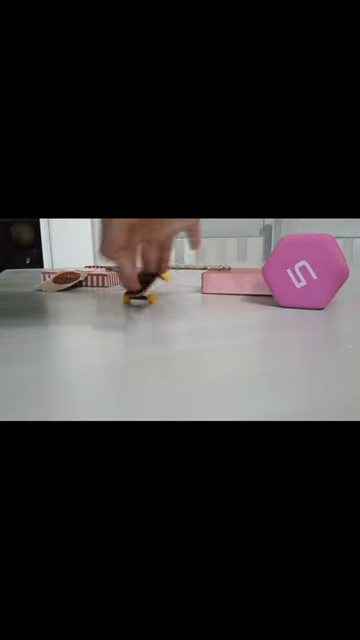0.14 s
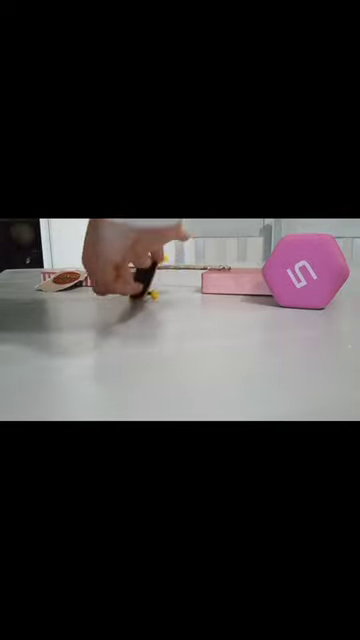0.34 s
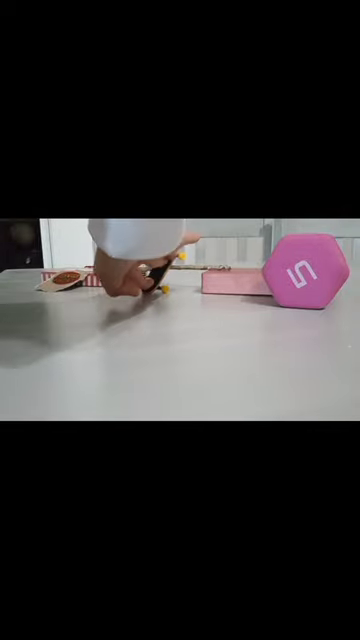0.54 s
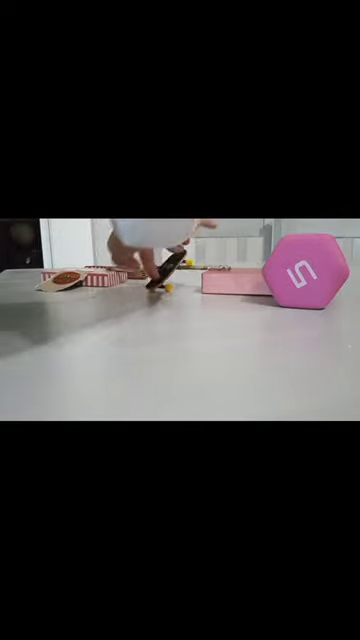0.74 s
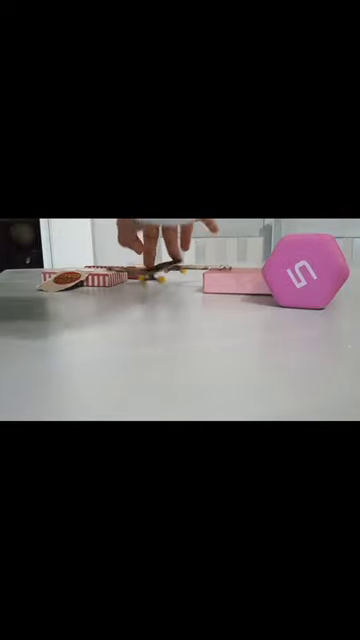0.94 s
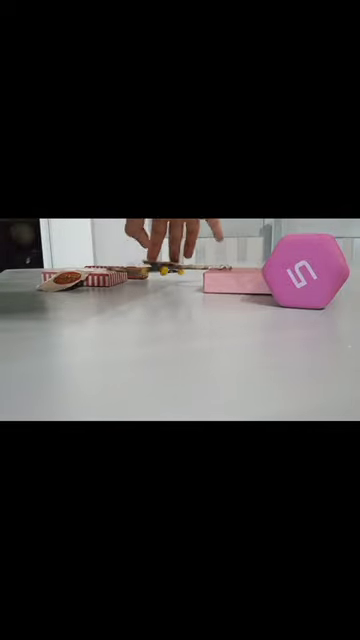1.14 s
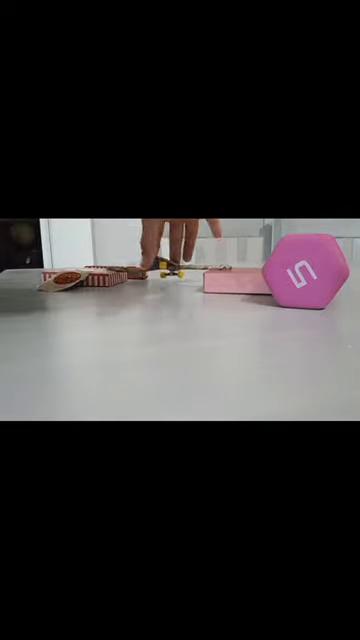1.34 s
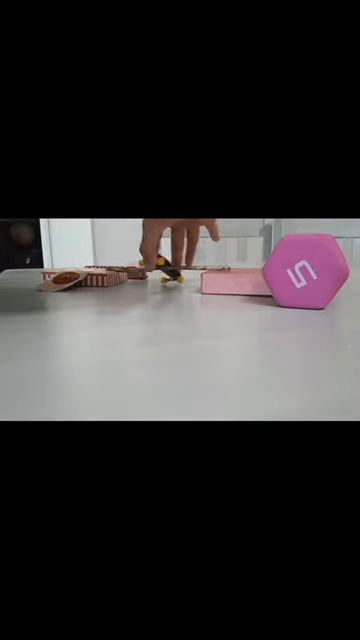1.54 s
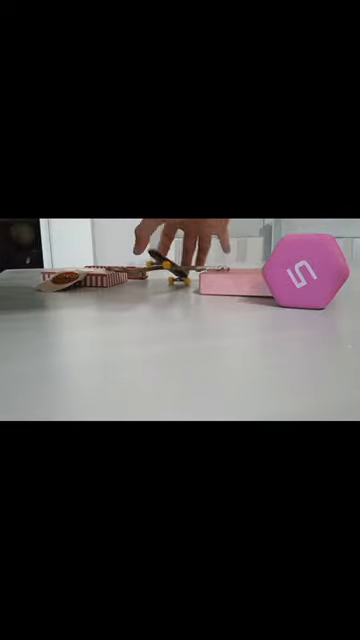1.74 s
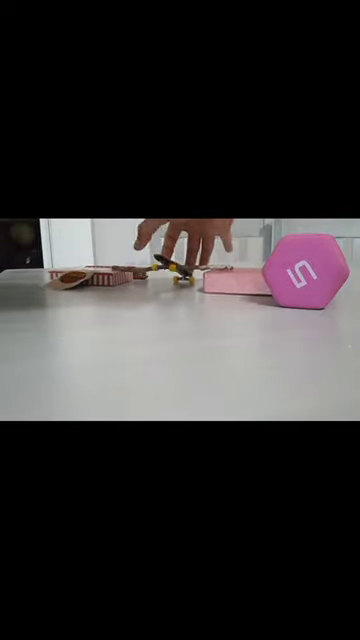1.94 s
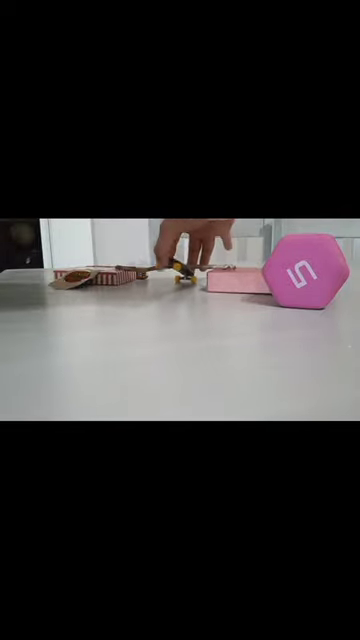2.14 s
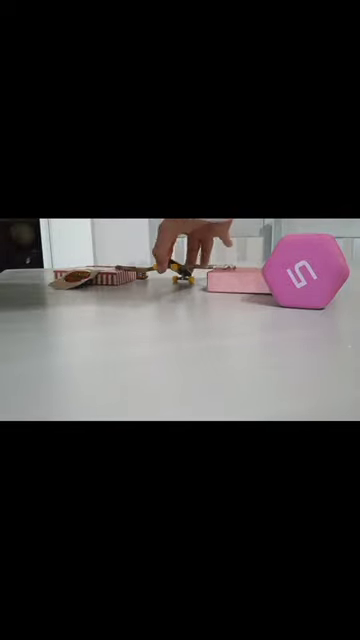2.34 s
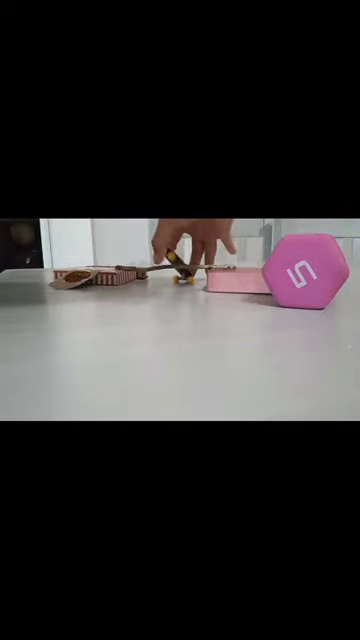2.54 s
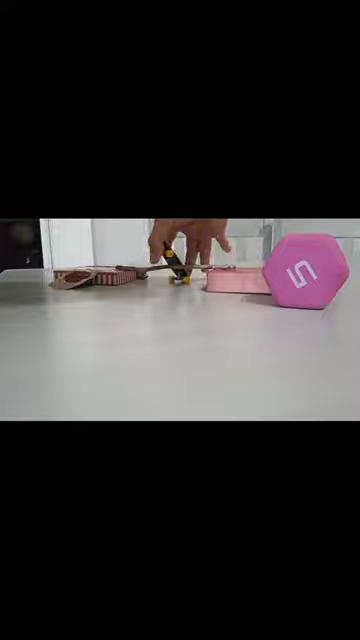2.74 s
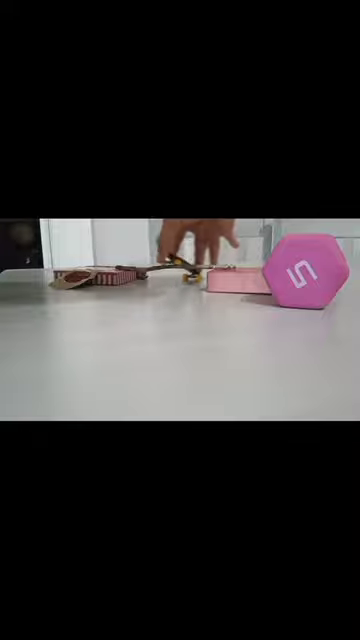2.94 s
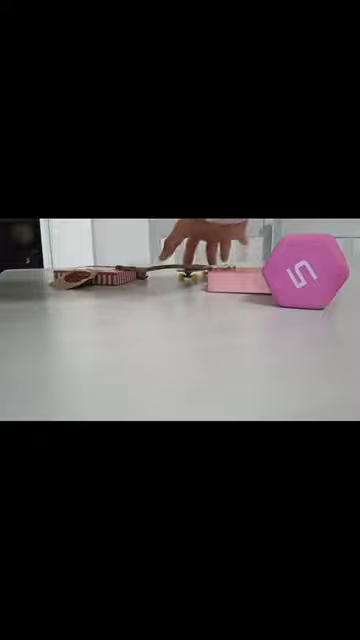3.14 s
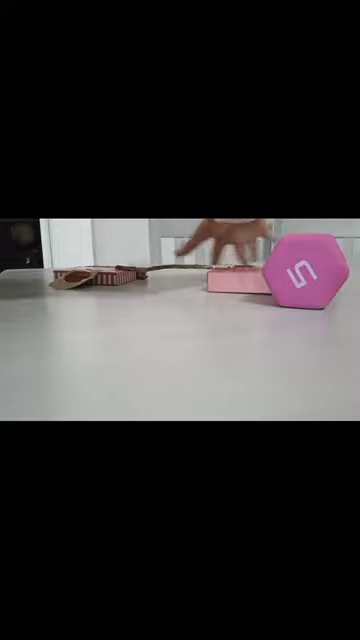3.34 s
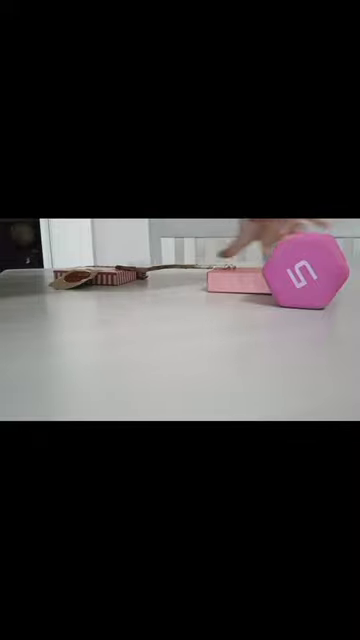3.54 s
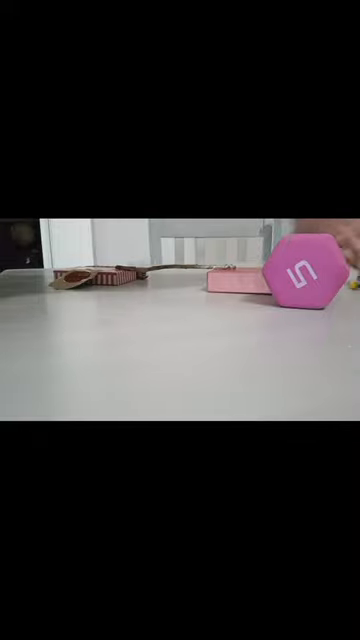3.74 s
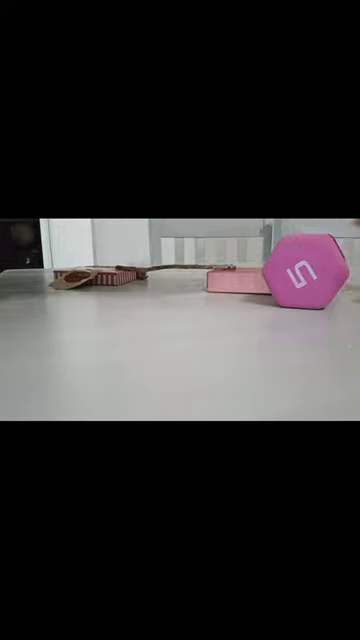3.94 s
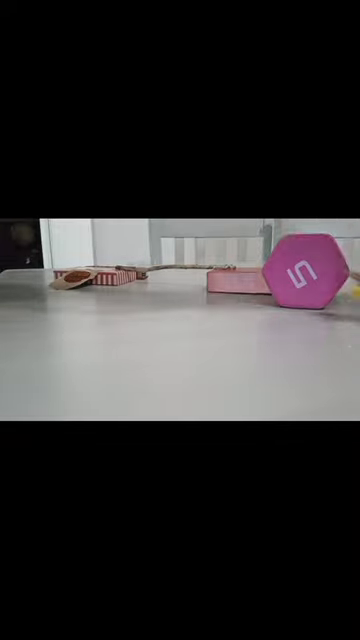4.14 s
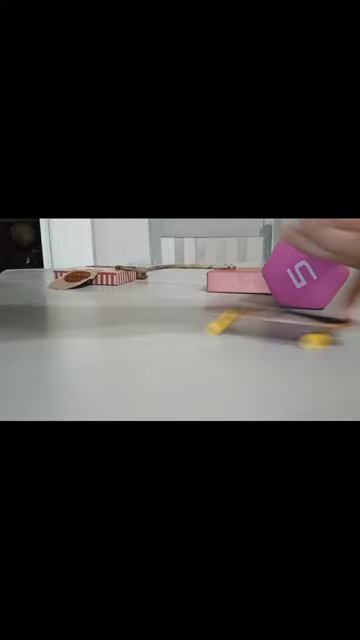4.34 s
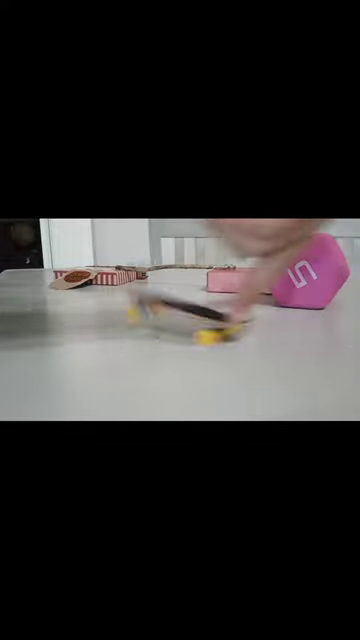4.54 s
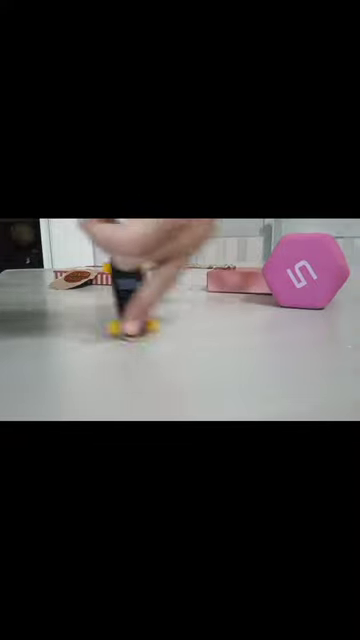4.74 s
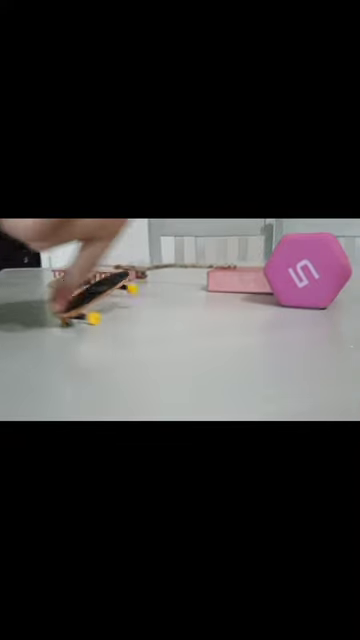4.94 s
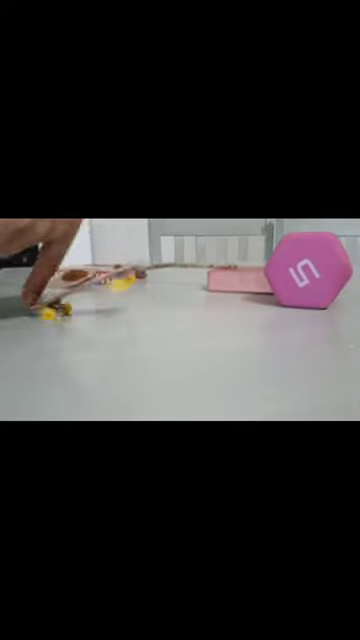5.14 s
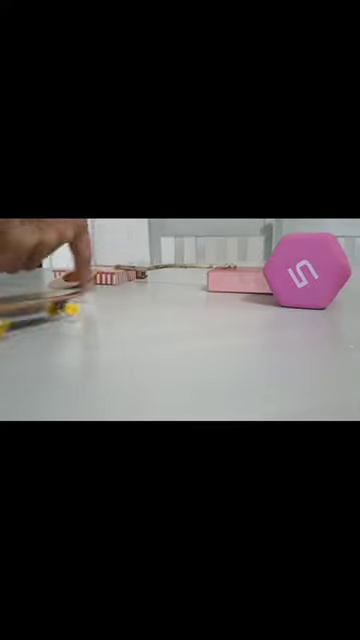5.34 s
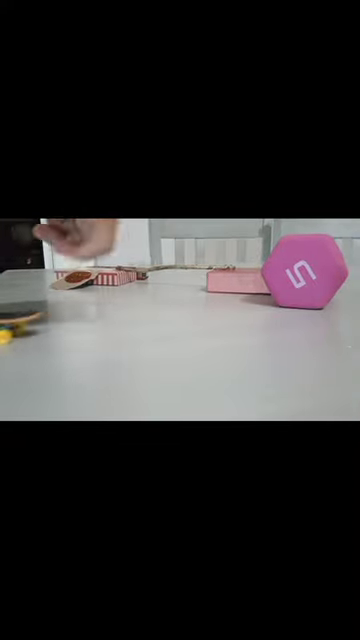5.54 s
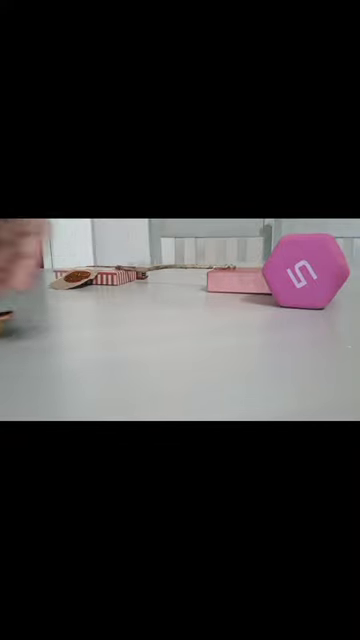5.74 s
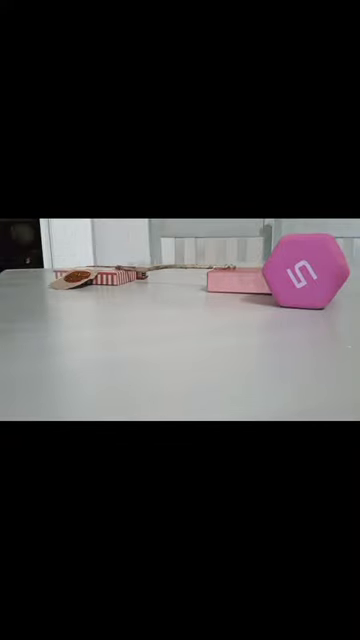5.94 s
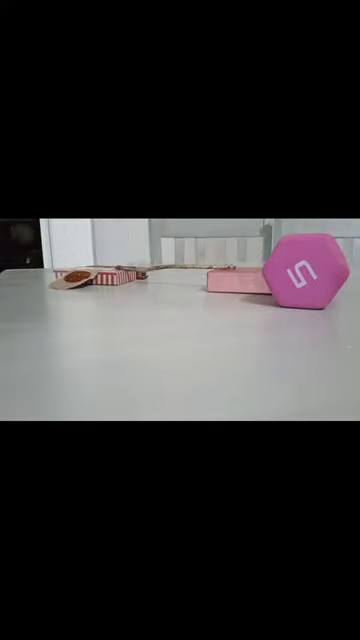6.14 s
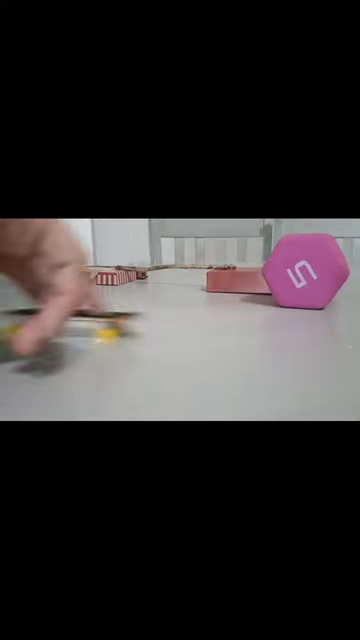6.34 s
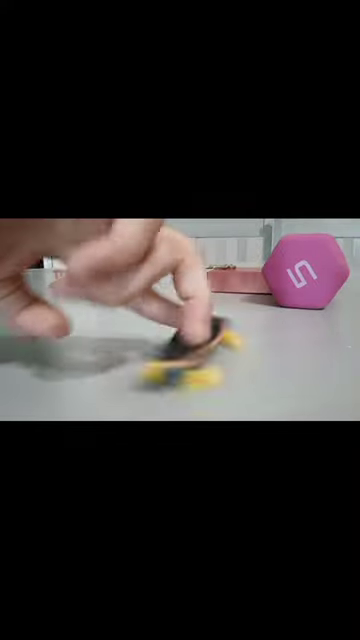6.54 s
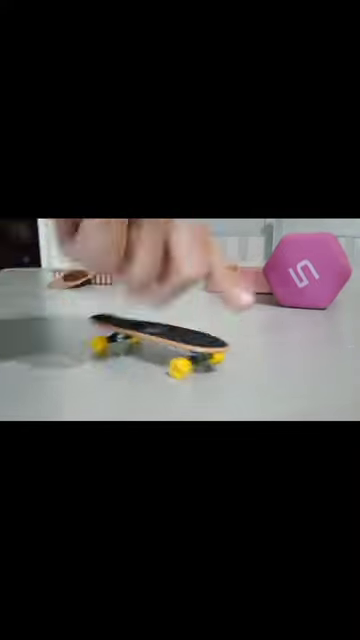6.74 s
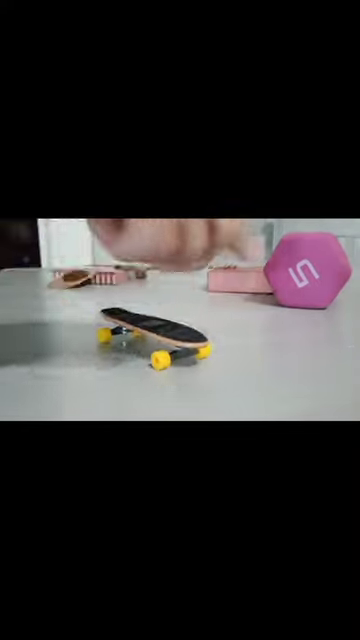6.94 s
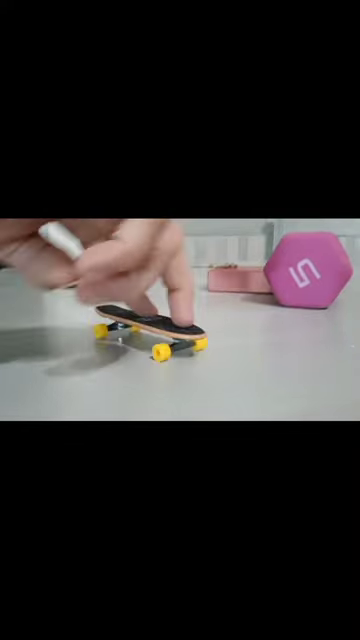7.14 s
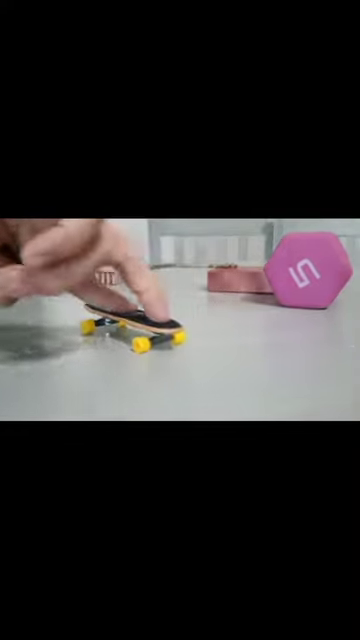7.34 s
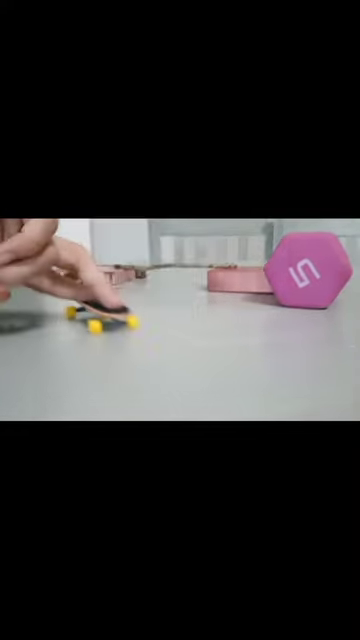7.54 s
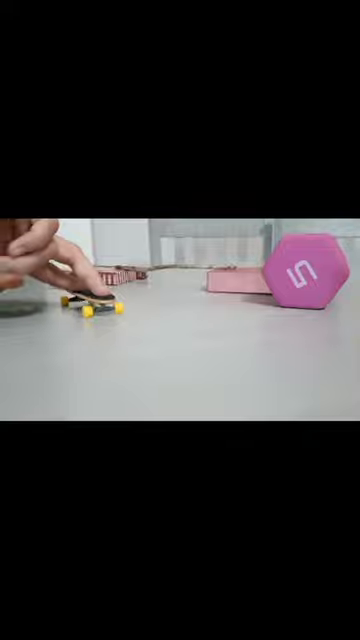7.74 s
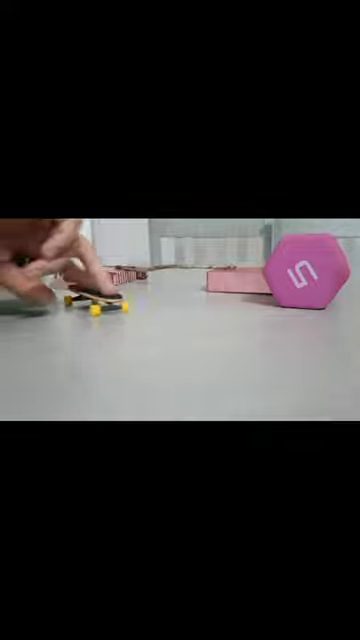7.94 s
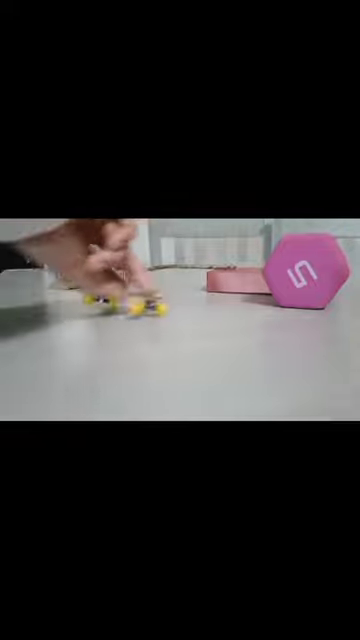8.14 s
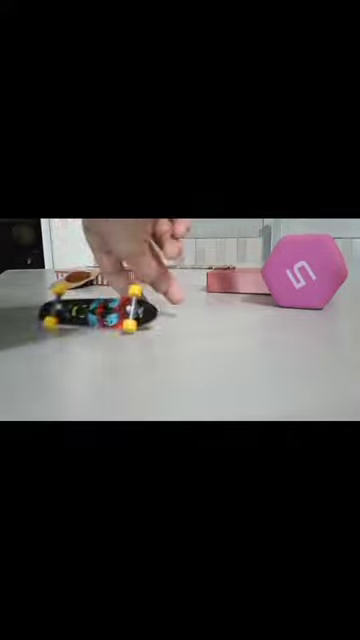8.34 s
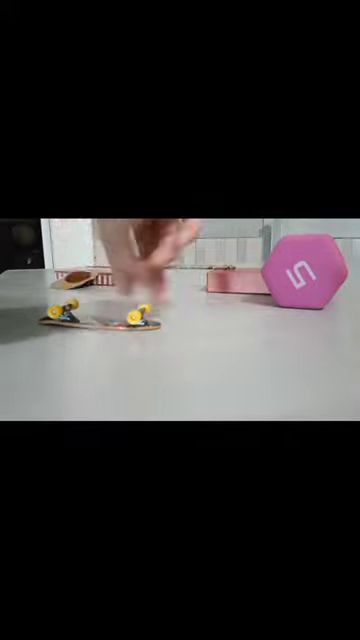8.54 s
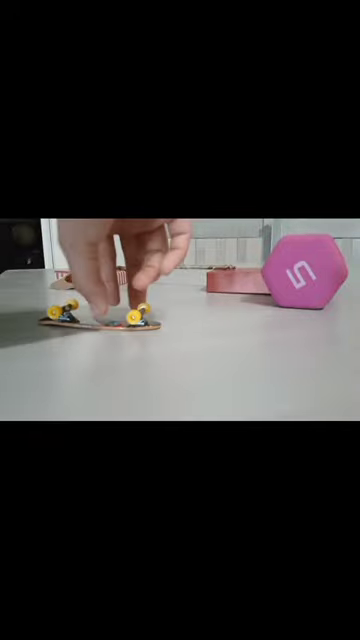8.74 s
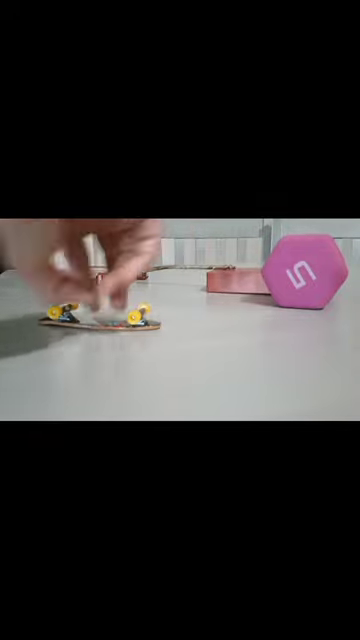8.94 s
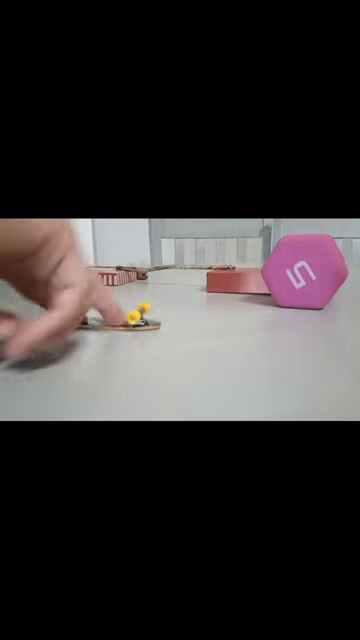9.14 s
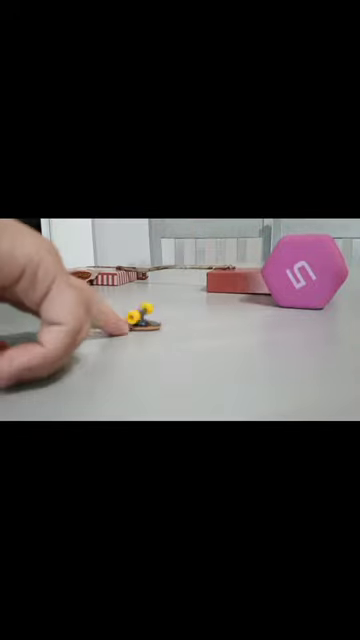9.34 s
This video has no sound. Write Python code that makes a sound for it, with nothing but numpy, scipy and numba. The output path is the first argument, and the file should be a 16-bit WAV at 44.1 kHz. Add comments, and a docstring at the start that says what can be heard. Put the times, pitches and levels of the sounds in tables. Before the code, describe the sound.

In a small, lightly echoing room with soft noise and a faint wavering low hum, a tiny skateboard is handled on a hard table, close to the microphone. From 0 to 3 seconds come light wheel taps and clicks, faint short scuffs, and a crisp metallic tick near 1.75. A small clatter at 3.1-3.3 starts a long gritty roll, loudest around 3.75-4.2, with a thin squeak near 4.1. It weakens while sharp clicks land at 4.5-4.9, ending about 5.3. A squeak and a cluster of clacks follow at 5.4-5.6, then a light ringing knock near 6.1. Stronger rolling pushes swell at 6.4-6.9, with taps, and again at 7.5-7.8, blending into a short rasping skid. After a faint scrape at 8.2, the deck slaps down brightly around 8.37, the loudest hit, with rapid clacks until 8.8. Then only quiet hum and room tone remain.

```python
"""In a small room, a fingerboard is popped, landed and pushed about on a hard table.
Rolling, skidding and squeaking wheels are streams of random ticks sent through moving resonances.
Deck and wheel clacks are short noise bursts, coloured by the part that is struck.
Table and trucks colour most sounds with shared resonances, the walls ring briefly,
and an appliance hums faintly under soft room tone."""
import sys
import numpy as np
from scipy import signal
from scipy.fft import rfft, irfft
from scipy.io import wavfile
from scipy.ndimage import uniform_filter1d
from numba import njit

SR = 44100
rng = np.random.default_rng(int(sys.argv[2]) if len(sys.argv) > 2 else 0)


def generate_wav(sig):
    """Save sig (samples, or channels by samples) to the path in sys.argv[1] as 16-bit PCM at SR."""
    pcm = np.round(np.clip(np.atleast_2d(sig).T, -1, 1) * 32767).astype(np.int16)
    wavfile.write(sys.argv[1], SR, pcm)


N = 418068
T = np.arange(N) / SR  # time in seconds

# the long run round the table, a path through these points; rumble and rattle are relative to level:
# time_s, level_db, contact_hz, table_rumble_db, truck_rattle_db
RUN_PATH = [(3.29, -42.5, 1020, -0.5, 6.5), (3.391, -39.5, 1190, -9.5, -9), (3.53, -34.5, 1170, -20.5, -13),
            (3.744, -29, 1080, -21.5, -14.5), (3.86, -29.5, 940, -15, -7),
            (4.01, -29.5, 1010, -18.5, -16.5), (4.09, -31, 815, -13.5, -8), (4.21, -34.5, 890, -16, -10),
            (4.28, -32, 804, -12, -9), (4.37, -38, 716, -1.5, -3.5), (4.45, -39, 606, -4, -5.5),
            (4.576, -41, 610, -5, -1.5), (4.742, -39.5, 760, -14.5, -8), (4.92, -40, 716, -14.5, -7),
            (4.996, -41.5, 680, -19, -19), (5.185, -40, 920, -41.5, -12.5),
            (5.246, -51.5, 1110, -24.5, -15.5), (5.28, -62.5, 1100, -11, -22.5)]
# short pushes that swell and fade; swell_db is how far the level drops at either end:
# start_s, rise_ms, fall_ms, top_level_db, swell_db, contact_hz, table_rumble_db, truck_rattle_db
SHORT_PUSHES = [(0.236, 8.8, 75, -53, 12, 1320, -21, -9.5), (0.4, 104, 25, -51, 9.5, 1624, -15, -28),
                (0.514, 110, 141, -44, 8, 950, -15.5, -11), (0.9, 28, 110, -56.5, 2, 600, -1.5, -11.5),
                (1.678, 150, 250, -54, 9.5, 800, -6, -18.5), (2.014, 148, 44, -55, 7, 933, -2, -11.5),
                (3.078, 11, 140, -42, 4, 940, -19.5, -9.5), (5.314, 41, 110, -47.5, -1, 760, -24, -13.5),
                (5.5, 114, 150, -47.5, 14.5, 1174, -5, 2.5), (6.357, 51, 31, -35.5, 14, 1200, -12.5, -1.5),
                (6.43, 220, 240, -32, 7.5, 948, -10.5, -10), (6.72, 76, 182, -34, 19.5, 1065, -9, -6),
                (7.488, 23, 220, -46, 9.5, 1260, -25, -13.5), (7.627, 69, 210, -34, 13.5, 1040, -24, -21)]
# pops, landings, taps and short clatters; the level is the energy as if spread over 10 ms:
# time_s, level_db, treble_tilt_db_per_octave, contact_ms, struck_part (a name)
BLOWS = [(0.0494, -39, -4.5, 12, "wheel"), (0.0858, -37.5, -2.5, 2.5, "wheel"),
         (0.178, -47.5, -10.5, 14, "deck"), (0.517, -37, -4, 33, "wheel"), (0.683, -42, -3.5, 3.9, "wheel"),
         (0.848, -34, -6, 3.7, "wheel"), (0.861, -35, -1.5, 3.2, "deck"), (0.896, -40.5, -5, 3.9, "deck"),
         (1.062, -47.5, -5.5, 13, "wheel"), (1.288, -40.5, 0, 18, "wheel"),
         (1.753, -34.5, 0.5, 5.4, "hanger"), (1.7956, -41.5, 0, 1.7, "hanger"),
         (1.959, -37, -1.5, 3.2, "wheel"), (2.203, -50.5, -23, 4.7, "top"),
         (2.519, -45.5, -10, 5.7, "wheel"), (2.7416, -39.5, -1.5, 13.5, "nose"),
         (3.107, -36, -5, 7, "deck"), (3.221, -34, -1, 18, "deck"), (3.2625, -26, 0.5, 2.8, "axle"),
         (3.2877, -33.5, -2, 3.5, "hanger"), (3.3, -37, -14, 42, "table"), (3.8945, -37, 9, 3.8, "hanger"),
         (4.505, -32, 1, 12, "axle"), (4.5562, -26.5, -1.5, 1.6, "axle"), (4.57, -32.5, -12, 21, "top"),
         (4.6406, -29, -1, 4.3, "hanger"), (4.84, -31, 5, 4.1, "axle"), (4.905, -31, 7, 14, "truck"),
         (5.414, -36.5, 1.5, 15, "truck"), (5.5037, -25.5, -1, 1.6, "table"),
         (5.542, -32.5, 4, 6.1, "wheel"), (5.566, -30, -2.5, 4.5, "table"), (5.596, -32.5, 0, 6.5, "nose"),
         (5.97, -34.5, 1, 3.8, "truck"), (5.9795, -38, -4.5, 1.8, "truck"), (6.135, -39, -1.5, 3.4, "nose"),
         (6.541, -39, -14, 2.8, "wheel"), (6.384, -31, -6, 22, "table"),
         (6.6245, -26.5, -12.5, 2.6, "wheel"), (6.783, -31, -1, 5.8, "wheel"),
         (6.8235, -32, 2, 1.5, "axle"), (7.244, -36, -4.5, 4.9, "wheel"), (7.262, -32.5, -7.5, 22, "wheel"),
         (7.305, -45, -6.5, 2, "axle"), (8.2603, -40, -4, 1.7, "wheel"), (8.36, -28, -2, 8.2, "tail"),
         (8.371, -18.5, 11.5, 4.8, "deck"), (8.4308, -23, -2.5, 0.79, "nose"),
         (8.4415, -33.5, 3, 2.5, "wheel"), (8.4736, -29, -3.5, 3.9, "deck"), (8.492, -29.5, -4, 63, "nose"),
         (8.679, -26, 1.5, 2.3, "deck"), (8.683, -35.5, -12.5, 8, "table"),
         (8.7255, -28.5, -2, 5.1, "deck"), (8.748, -29.5, 3, 13, "deck"), (8.776, -39.5, 2.5, 35, "axle")]
# how each struck part answers, by name; the thud also grows with treble tilt, the after-ring is scaled up:
# ring_hz, ring_db, thud_db, after_ring_db
STRUCK_PARTS = {"table": (310, 4, 4, 6), "wheel": (1020, 7.5, 0, 0), "top": (389, 12, 5, 7),
                "tail": (700, 13, -4, 7), "deck": (640, 6.9, 10, 5), "nose": (1850, 4, 3, 0),
                "hanger": (2980, 2, 3, 0), "truck": (5500, 6, 0, 0), "axle": (6100, 4, 12, 0)}
# wheels dragged over the top: start_s, attack_ms, hold_ms, release_ms, level_db
WHEEL_SKIDS = [(7.639, 61, 74, 184, -41.5), (8.185, 3, 71, 19, -43.5)]
# what a skidding wheel rings with: pitch_hz, width_hz, level_db
SKID_RINGS = [(687, 230, -14), (1215, 400, 1), (1905, 230, -9), (3010, 710, -20), (4430, 350, -12),
              (4780, 740, -15.5), (8600, 3800, -29)]
# a dry wheel on its axle: start_s, rise_ms, fall_ms, pitch_hz, level_db
AXLE_SQUEAKS = [(1.03, 21, 20, 10100, -59), (4.07, 93, 86, 6800, -40.5), (4.76, 125, 116, 5380, -46.5),
                (5.385, 43, 23, 5280, -39), (5.961, 8.8, 18, 5470, -35.5)]
# ringing of the lightly held deck: pitch_hz, level_db, fade_by_60_db_s
DECK_RINGS = [(827, -7, 0.055), (2095, 0.5, 0.039), (2690, 10, .016), (3200, -2, 0.018), (3620, -7, 0.016)]
# peaks and dips of the table top and, above 5 kHz, the metal trucks: centre_hz, width_hz, boost_db
BODY_PEAKS = [(398.7, 13, 10), (601, 26, 7.5), (686, 23, 5.5), (1053, 370, 4.5), (1350, 37, -8),
              (1908, 140, 4), (2810, 76, 4), (3820, 84, 4.5), (5420, 970, 7.5), (6654, 710, 8.5),
              (12700, 2670, -12.5), (15300, 860, -6.5)]
# tone of the wheel contact: pitch_hz, level_db
WHEEL_TONE = [(200, -25), (400, -12), (560, 2), (1000, 0), (1700, -1), (2600, -8.5), (4000, -4),
              (9000, -64.5)]
# tone of the rumbling table: pitch_hz, level_db
RUMBLE_TONE = [(90, -23.5), (200, -1.5), (350, 7), (650, 1.5), (1200, -31)]
# tone of the rattling trucks: pitch_hz, level_db
RATTLE_TONE = [(1200, -12), (2500, 3), (6500, -6), (8000, -7), (11000, -6.5), (16000, -2)]
# tone of a blow: pitch_hz, level_db
BLOW_TONE = [(80, -32), (220, -2.5), (450, -2), (900, 2.5), (7000, -3), (16000, 4)]
# how long the room rings: pitch_hz, fade_by_60_db_s
ROOM_FADE = [(200, 0.083), (1500, 0.49), (6500, 0.3), (15000, 0.081)]
# lines of the appliance hum, before the bass flutter: pitch_hz, level_db
HUM_LINES = [(70, -62.5), (122, -64), (139, -62), (220.7, -67)]
# shape of the room tone: pitch_hz, relative_level_db_per_hz
AIR_TONE = [(25, -25.5), (140, -3), (180, -12), (250, -16.5), (335, -22), (607, -23.5), (988, -28.5),
            (1070, -30.5), (1790, -31.5), (2550, -39), (4870, -37.5), (7920, -55), (16000, -61.5)]


def undb(db):
    """Turn decibels into a gain."""
    return 10 ** (np.asarray(db) / 20)


def unit(x):
    """Scale to an rms of 1."""
    return x / np.sqrt(np.mean(x ** 2))


def at(points, hz):
    """Read a table of pitch and value along a logarithmic pitch axis."""
    f, value = np.transpose(points)
    return np.interp(np.log(hz), np.log(f), value)


def walk(rate):
    """Smooth random wander with a spread near 1, drawn about `rate` times a second."""
    k = max(int(SR / rate), 2)
    steps = np.repeat(rng.standard_normal(N // k + 1), k)
    return unit(uniform_filter1d(uniform_filter1d(steps, k), k)[:N])


def grains(rate, spread_db):
    """Tiny impacts at random moments, `rate` a second, a few much larger than the rest."""
    hits = rng.random(N) < rate / SR
    sizes = undb(spread_db * np.minimum(rng.exponential(size=N), 4))
    return hits * sizes * rng.choice([-1, 1], N)


@njit
def bandpass(x, hz, width):
    """A resonance with a moving centre, made with a state-variable filter."""
    y, b, l = np.empty(len(x)), 0., 0.
    for i in range(len(x)):
        g, k = np.tan(np.pi * hz[i] / SR), width / hz[i]
        v = (b + g * (x[i] - l)) / (1 + g * (g + k))
        b, l, y[i] = 2 * v - b, l + 2 * g * v, k * v
    return y


def double_bandpass(x, hz, width):
    """The same resonance twice in a row, for steeper sides."""
    return bandpass(bandpass(x, hz, width), hz, width)


def response(colour_db, size=2048):
    """Impulse response that starts at once and has the given colour in dB (minimum phase)."""
    hz = np.maximum(np.arange(size // 2 + 1) * SR / size, 1)
    cepstrum = irfft(np.log(undb(colour_db(hz))))
    cepstrum[1:size // 2] *= 2
    cepstrum[size // 2 + 1:] = 0
    return irfft(np.exp(rfft(cepstrum)))


def body_db(hz):
    """How strongly table and trucks answer at each pitch; each peak is widened by 2 Hz."""
    return sum(db / (1 + ((hz - f) / (width / 2 + 1)) ** 2) for f, width, db in BODY_PEAKS)


def through_body(force, tone):
    """A contact force of the given tone, sounding through table and trucks; rms 1."""
    colour = response(lambda hz: at(tone, hz) + body_db(hz))
    return unit(signal.fftconvolve(force, colour)[:N])


def rolling(contact_width_hz=410.0, broad=0.33, wheel_db=-1, rattle_db=0.7, bump_db=3.0, shake_db=2.5,
            bright_hz=8000, bright_from_db=-50, bright_power=0.45,
            upper_ratio=1.65, upper_db=-6.0, upper_from_db=-30, upper_power=0.65):
    """Wheels strike the table's grain; the bumps ring the contact, drum the top and shake the trucks."""
    gain, contact_hz, rumble_rel, rattle_rel = motion()
    # the finger's uneven load makes the contact flutter in strength and pitch
    bumps = np.tanh(walk(70))
    # less rattle stands for a lighter load: the wheels then sing a purer, steadier note
    load = np.clip(1 + rattle_rel / 24, .25, 1)
    contact_hz = np.clip(contact_hz * np.exp(0.23 * load * walk(30)), 300, 3000)
    tread = through_body(grains(2200, 3.3), WHEEL_TONE)
    wheels = unit(broad * load * tread + bandpass(tread, contact_hz, contact_width_hz))
    # louder, faster rolling also wakes a higher resonance of the wheels
    fine_tread = through_body(grains(4000, 5.7), WHEEL_TONE)
    upper = unit(bandpass(fine_tread, upper_ratio * contact_hz, contact_width_hz))
    wheels = unit(wheels + upper * undb(upper_db) * (gain / undb(upper_from_db)) ** upper_power)
    rumble = through_body(grains(1500, 2.4), RUMBLE_TONE)
    top = undb(wheel_db) * wheels + undb(rumble_rel) * rumble
    top = shifting_modes(top, 279.7, 2879, width=0.03, depth=1.41, rate=16, count=26)
    trucks = unit(rattle() * undb(shake_db * walk(150)))
    # loose wheels tick against their axles
    trucks = trucks + undb(-8) * through_body(grains(90, 2), RATTLE_TONE)
    # harder shaking makes the metal contacts brighter
    highpass = signal.butter(2, bright_hz, "high", fs=SR, output="sos")
    treble = signal.sosfiltfilt(highpass, trucks)
    shaking = gain * undb(rattle_rel - bright_from_db)
    trucks = trucks + treble * (shaking ** bright_power - 1)
    return gain * undb(bump_db * bumps) * (top + undb(rattle_db + rattle_rel) * trucks)


def motion(fade_s=0.022):
    """The long run and the pushes joined: gain, contact resonance, rumble and rattle over time."""
    def down(start, end):  # 1 while the board is on the table
        return np.interp(T, [start - fade_s, start, end, end + fade_s], [0, 1, 1, 0])

    s, run_db, *run_colour = np.transpose(RUN_PATH)
    gain = down(s[0], s[-1]) * undb(np.interp(T, s, run_db))
    colour = np.array([np.interp(T, s, column) for column in run_colour])
    for start, rise_ms, fall_ms, db, swell_db, *own_colour in SHORT_PUSHES:
        fastest, end = start + np.cumsum([rise_ms, fall_ms]) / 1000
        # the level arches over the fastest moment; the stronger of two overlapping moves sets the colour
        away = np.interp(T, [start, fastest, end], [1, 0, 1])
        push = down(start, end) * undb(db - swell_db * away ** 2)
        colour[:, push > gain] = np.array(own_colour)[:, None]
        gain = np.maximum(gain, push)
    return gain, *colour


def shifting_modes(x, lo_hz, hi_hz, width, depth, rate, count):
    """Narrow resonances swell and vanish as the contact points move; the overall level is kept."""
    centres = np.geomspace(lo_hz, hi_hz, count) * rng.uniform(.97, 1.03, count)
    y = x + depth * sum(walk(rate) * bandpass(x, np.full(N, hz), width * hz) for hz in centres)

    def power(v):
        return uniform_filter1d(v ** 2, SR // 20)

    return y * np.sqrt(power(x) / power(y))


def rattle(band_db=3.0, drift_db=1.4, grain_db=2.5, width=0.13, count=16):
    """Loose metal parts chatter, each in its own band and its own bursts."""
    out = 0
    for hz in np.geomspace(1400, 15000, count):
        chatter = grains(600, grain_db) * undb(band_db * walk(70) + drift_db * walk(14))
        out = out + double_bandpass(chatter, np.full(N, hz), 2 * width * hz)
    return through_body(out, RATTLE_TONE)


def clacks(thud_hz=600, thud_per_tilt=0.69, tilt_hz=1400, rise=0.45, lead_in_db=-13, lead_in=0.98,
           settle_db=-24, settle_ms=25, ring_width=0.24, sing_width=0.017, sing_scale=1.86, size=4096):
    """Each blow swells in, strikes and chatters; long contacts start softly, and the struck part rings."""
    lead = size // 4  # room for the swell before the strike
    out, ms = np.zeros(N + 2 * size), (np.arange(size) - lead) / SR * 1000
    for s, db, tilt_db, contact_ms, part in BLOWS:
        ring_hz, ring_db, part_thud_db, sing_db = STRUCK_PARTS[part]
        # a harder, brighter blow also drums the table more
        thud_db = part_thud_db + thud_per_tilt * tilt_db
        age = np.maximum(ms, 0) / (rise * max(contact_ms, 1))
        # a faint noise swells just before the strike and fades after it
        swell = undb(lead_in_db) * np.exp(-np.abs(ms) / (lead_in * np.clip(contact_ms, 1, 6)))
        # afterwards the loose trucks settle in a fading chatter
        settle = undb(settle_db) * (ms > 0) * np.exp(-np.abs(ms) / settle_ms) * rng.exponential(size=size)
        force = rng.standard_normal(size) * (swell + age * np.exp(1 - age) + settle)
        force[np.argmin(np.abs(age - 1))] -= 2  # one sharp kick at the peak

        def colour_db(hz):
            thud = thud_db / (1 + (hz / thud_hz) ** 4)
            hardness = tilt_db * np.log2(1 + (hz / tilt_hz) ** 2) / 2
            distance = np.log(hz / ring_hz)
            ring = ring_db / (1 + (distance / ring_width) ** 2)
            # the centre of that resonance sings on after the contact
            sing = sing_scale * sing_db / (1 + (distance / sing_width) ** 2)
            return at(BLOW_TONE, hz) + body_db(hz) + thud + hardness + ring + sing

        blow = signal.fftconvolve(force, response(colour_db))
        start = int(s * SR) - lead
        out[start:start + len(blow)] += blow * undb(db) * np.sqrt(SR / 100 / np.sum(blow ** 2))
    return out[:N]


def skids(judder_db=3, waver=0.019):
    """Wheels stick and slip as they are dragged: a rasp that rings their resonances."""
    slips = grains(2500, 3.5) * undb(judder_db * walk(90))
    rasp, bend = 0, np.exp(waver * walk(25))
    for hz, width, db in SKID_RINGS:
        rasp = rasp + undb(db) * double_bandpass(slips, hz * bend, width)
    level = 0
    for start, *ms, db in WHEEL_SKIDS:
        corners = start + np.cumsum([0, *ms]) / 1000
        level = level + undb(db) * np.interp(T, corners, [0, 1, 1, 0])
    return unit(rasp) * level


def squeaks(width_hz=520, judder_db=3, waver=0.015):
    """A wheel sticks and slips on its axle and excites one rough, high resonance."""
    slips = bandpass(grains(5000, 2) * undb(judder_db * walk(120)), np.full(N, SR / 7), SR / 2)
    bend, out = np.exp(waver * walk(80)), 0
    for start, rise_ms, fall_ms, hz, db in AXLE_SQUEAKS:
        ring = unit(double_bandpass(slips, hz * bend, width_hz))
        corners = start + np.cumsum([0, rise_ms, fall_ms]) / 1000
        out = out + undb(db) * ring * np.interp(T, corners, [0, 1, 0])
    return out


def knock(start_s=6.1362, level_db=-33):
    """The lightly held deck knocks once and rings freely: a sum of fading sine waves."""
    t, ring = T[:SR // 2], 0
    for hz, db, t60 in DECK_RINGS:
        ring = ring + undb(db) * np.sin(2 * np.pi * hz * t) * np.exp(-np.log(1000) * t / t60)
    return np.pad(undb(level_db) * ring, (int(start_s * SR), N))[:N]


def wandering(x, ripple_db=5.2, step_s=0.05, count=80):
    """Each spot of the table favours other pitches: a new random colour every step, at the same level."""
    step = int(step_s * SR)
    out, roots = np.zeros(2 * N), np.linspace(0, np.sqrt(SR / 2), count)
    padded = np.pad(x, (step, 2 * step))
    for start in range(0, N + step, step):
        piece = padded[start:start + 2 * step] * np.hanning(2 * step)  # overlapping pieces
        ripple = ripple_db * np.tanh(rng.standard_normal(count))
        spot = signal.fftconvolve(piece, response(lambda hz: np.interp(np.sqrt(hz), roots, ripple)))
        level = np.linalg.norm(piece) / (np.linalg.norm(spot) + np.finfo(float).eps)
        out[start:start + len(spot)] += spot * level
    return out[step:step + N]


def room(x, count=3):
    """Add reflections whose pattern drifts, as when the board moves about."""
    shares = np.array([walk(5) for _ in range(count)])
    shares = shares / np.linalg.norm(shares, axis=0)
    return x + sum(signal.fftconvolve(x * share, walls())[:N] for share in shares)


def walls(tail_db=-5.5, tail_treble_db=-4, echo_db=-12, echo_s=.011, echo_smear_s=0.003, build_s=0.0096):
    """A near wall throws back a smeared echo; the rest of the room gives a diffuse, fading tail."""
    t = T[:SR]
    noise, tail = rfft(rng.standard_normal(SR)), 0
    centres = 125 * 2. ** np.arange(8)  # octave bands
    for hz, share in zip(centres, np.eye(len(centres))):
        band = irfft(noise * np.interp(np.log(np.arange(len(noise)) + 1), np.log(centres), share))
        build = np.clip(t / build_s - .5, 0, 1)
        decay = undb(-60 * t / at(ROOM_FADE, hz)) * build
        tilt = undb(tail_treble_db * hz / centres[-1])
        tail = tail + band * decay / np.sqrt(np.sum(decay ** 2)) * tilt
    echo = rng.standard_normal(SR) * np.exp(-np.abs(t - echo_s) / echo_smear_s) * (t > echo_s)
    return undb(tail_db) * tail + undb(echo_db) * echo / np.sqrt(np.sum(echo ** 2))


def background(air_db=-58.5, waver=0.82, wander_rad=1.0, flutter=0.54, low_hz=260):
    """Faint noise as room tone, with a low hum of wavering sine waves; the bass flutters unevenly."""
    freq = np.maximum(np.arange(N + 1) * SR / (2 * N), 1)
    noise = rfft(rng.standard_normal(2 * N))
    air = undb(air_db) * unit(irfft(noise * undb(at(AIR_TONE, freq)))[:N])
    bass = signal.sosfiltfilt(signal.butter(2, low_hz, fs=SR, output="sos"), air)
    hum = 0
    for hz, db in HUM_LINES:
        line = np.sin(2 * np.pi * hz * T + wander_rad * walk(18))
        hum = hum + undb(db) * unit((1 + waver * walk(12)) * line)
    return air - bass + np.clip(1 + flutter * walk(24), .1, 1.6) * (bass + hum)


def scene():
    """The board on the table, heard in the room."""
    board = wandering(rolling() + skids() + clacks())
    return (room(board + squeaks() + knock()) + background())[None]


def record(dry, top_hz=15750):
    """The sound has almost nothing above 15.75 kHz: a steep low-pass filter."""
    return signal.sosfilt(signal.ellip(10, .2, 70, top_hz, fs=SR, output="sos"), dry)


dry = scene()
out = record(dry)
generate_wav(out)
```